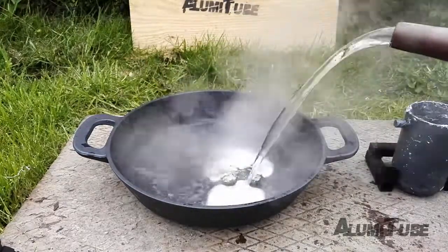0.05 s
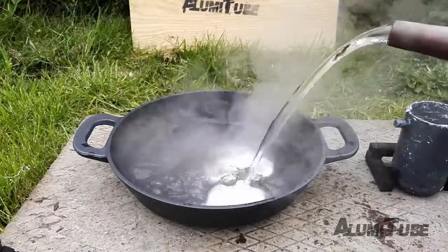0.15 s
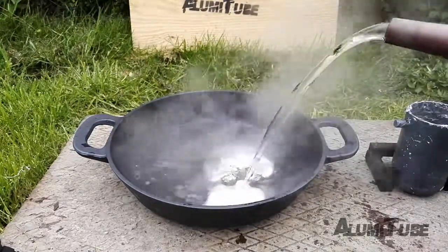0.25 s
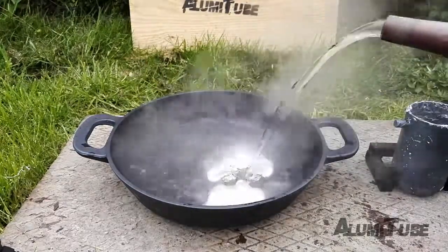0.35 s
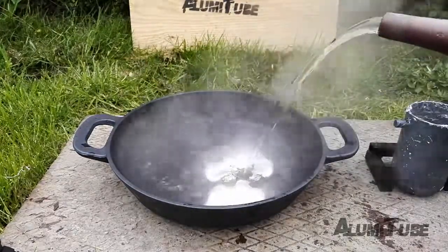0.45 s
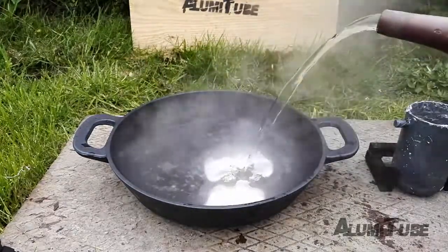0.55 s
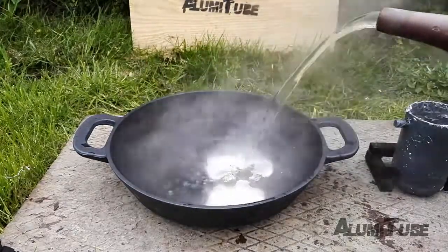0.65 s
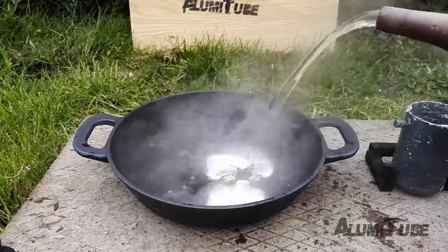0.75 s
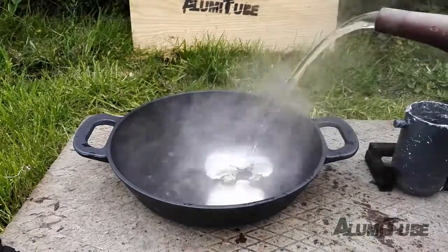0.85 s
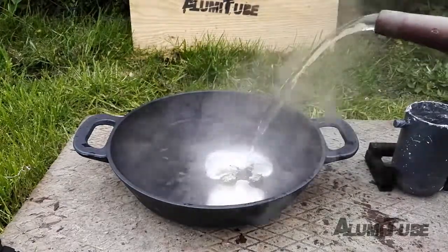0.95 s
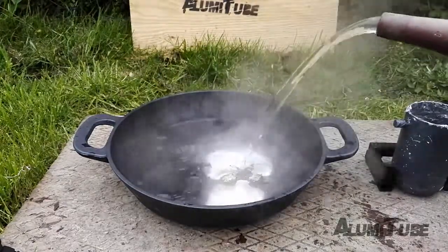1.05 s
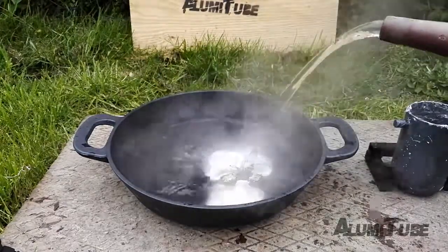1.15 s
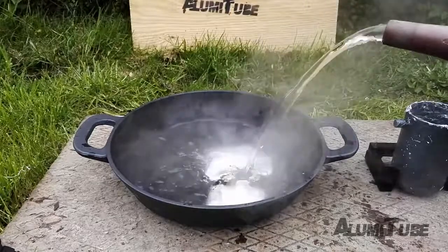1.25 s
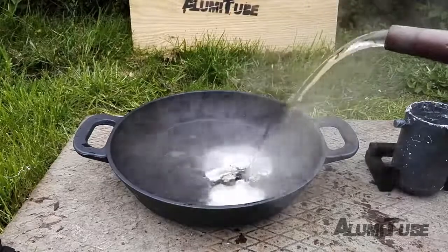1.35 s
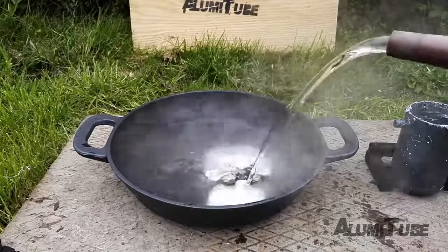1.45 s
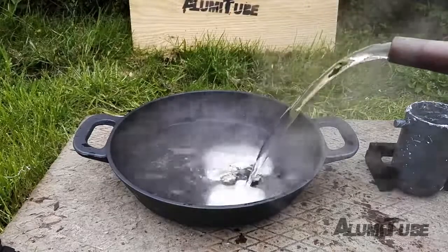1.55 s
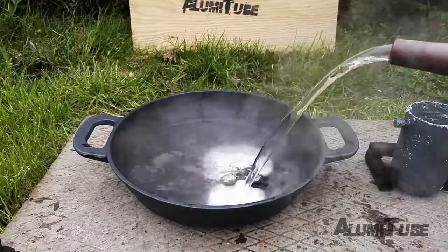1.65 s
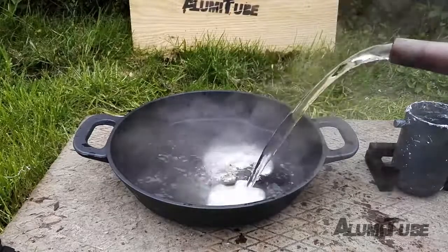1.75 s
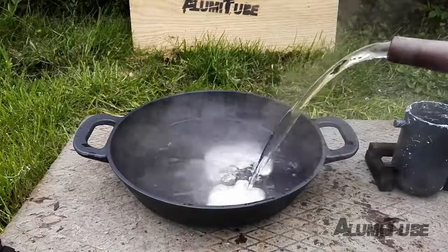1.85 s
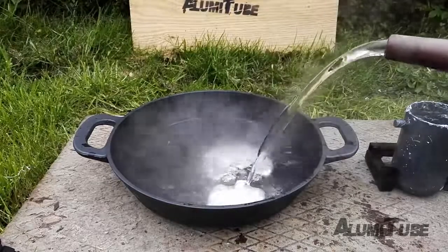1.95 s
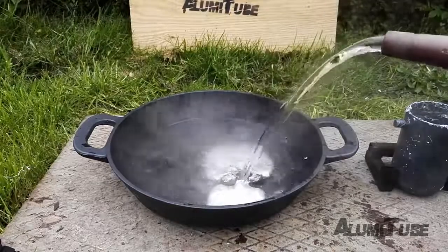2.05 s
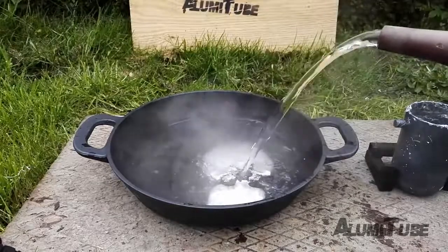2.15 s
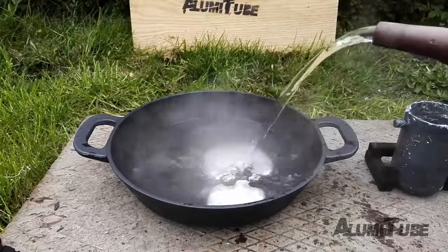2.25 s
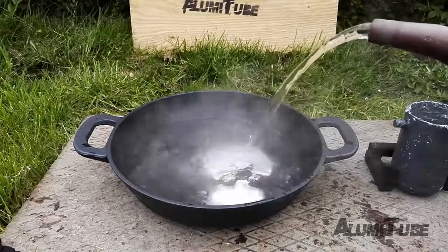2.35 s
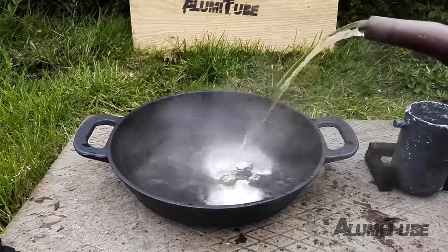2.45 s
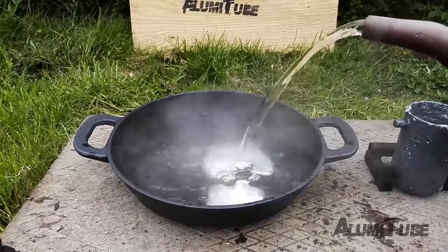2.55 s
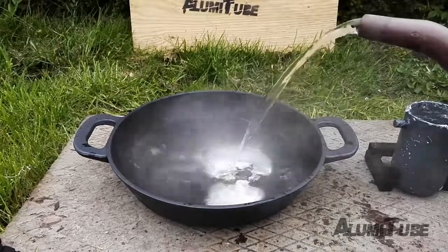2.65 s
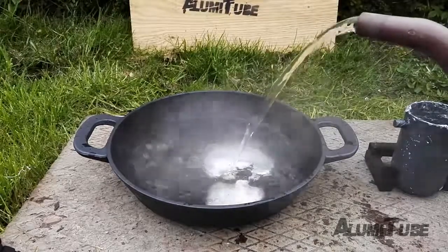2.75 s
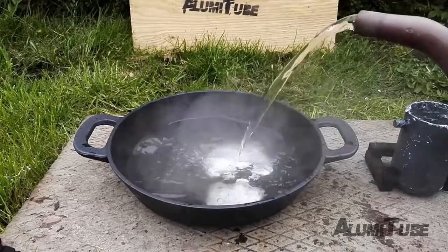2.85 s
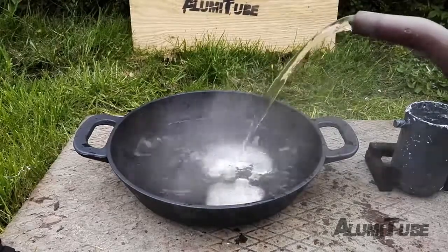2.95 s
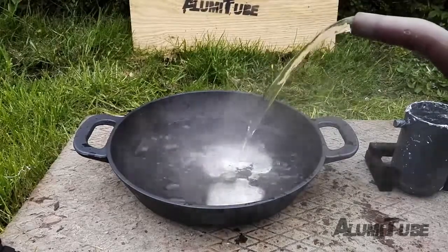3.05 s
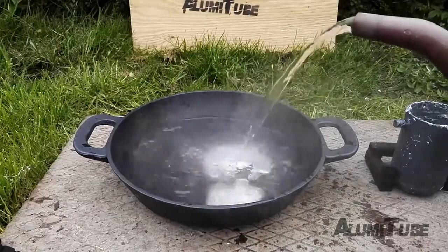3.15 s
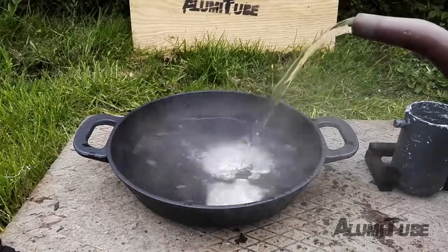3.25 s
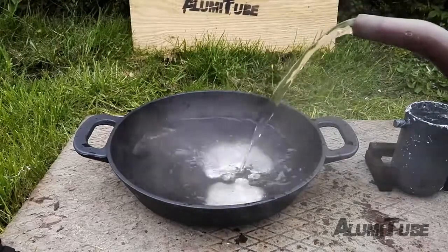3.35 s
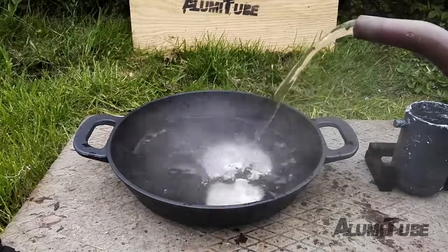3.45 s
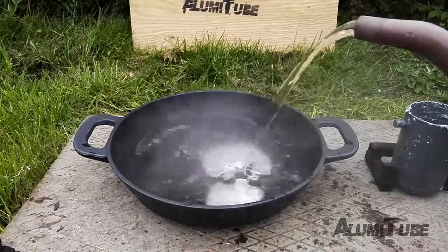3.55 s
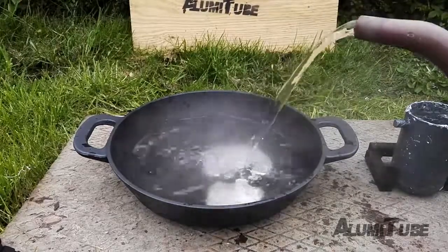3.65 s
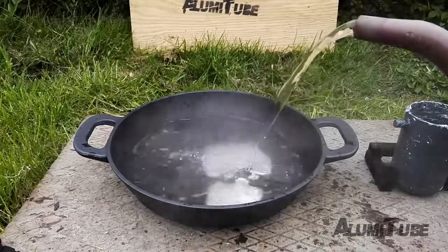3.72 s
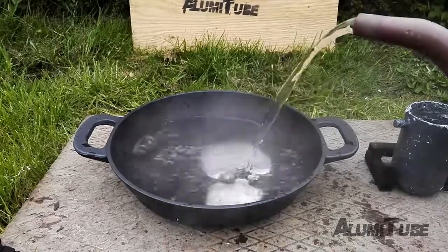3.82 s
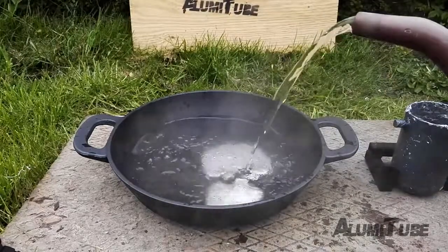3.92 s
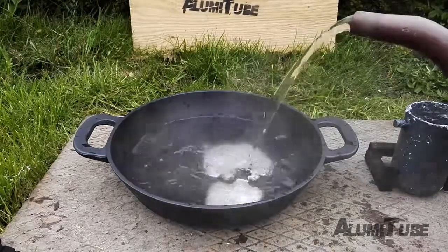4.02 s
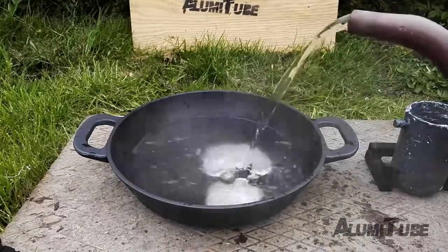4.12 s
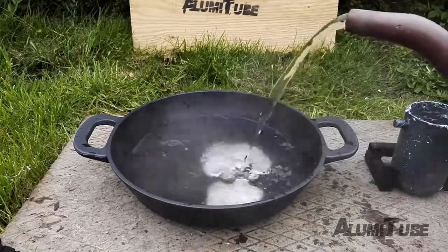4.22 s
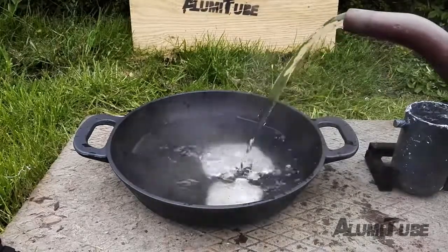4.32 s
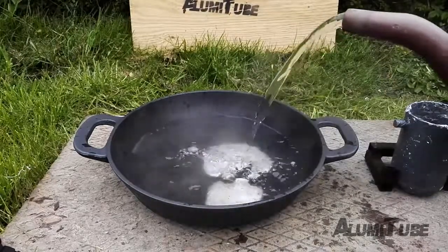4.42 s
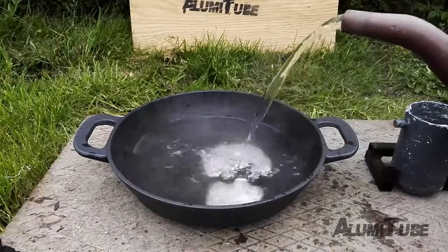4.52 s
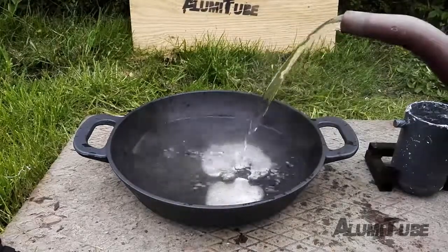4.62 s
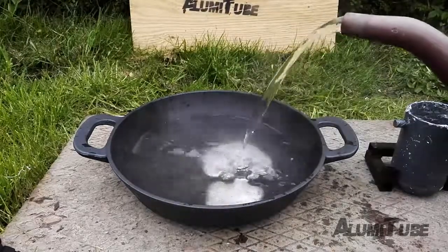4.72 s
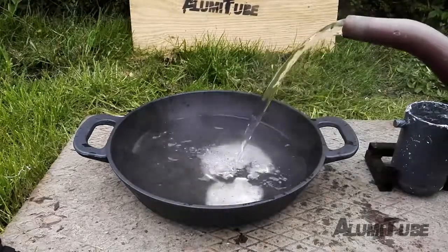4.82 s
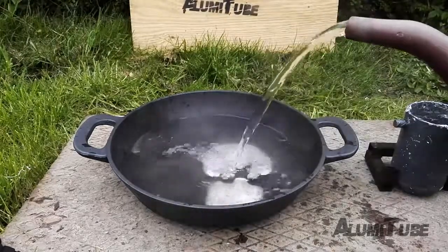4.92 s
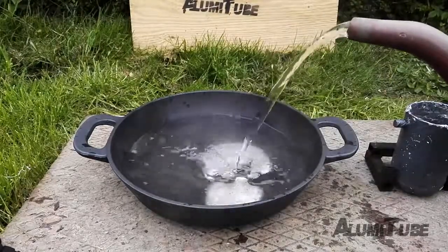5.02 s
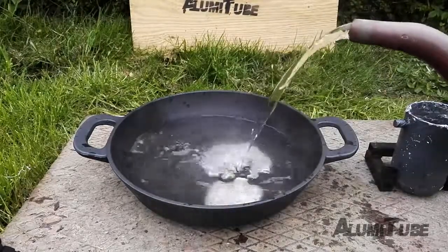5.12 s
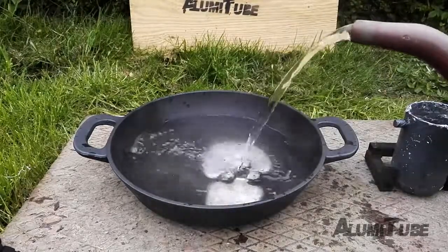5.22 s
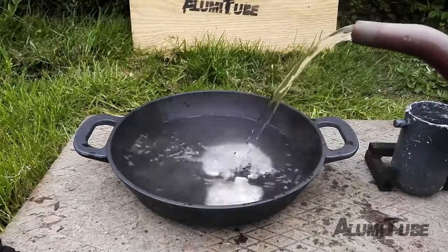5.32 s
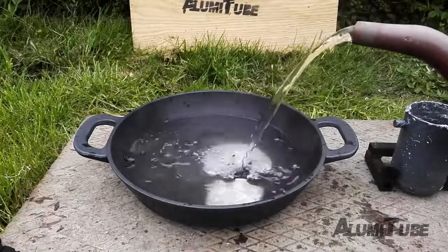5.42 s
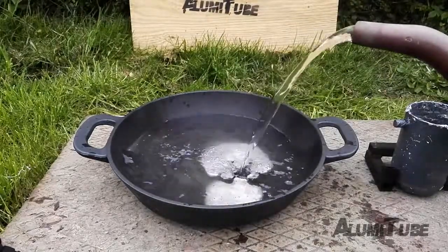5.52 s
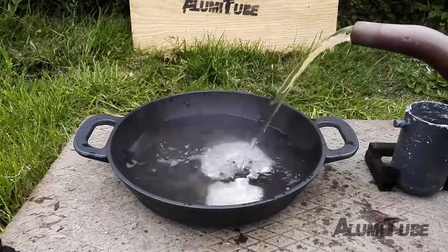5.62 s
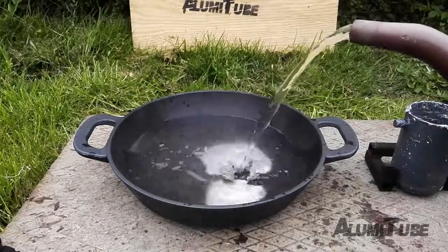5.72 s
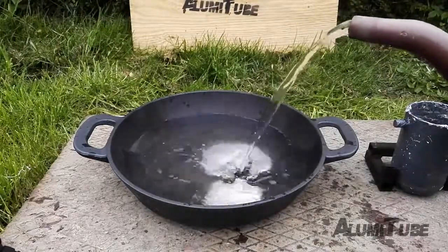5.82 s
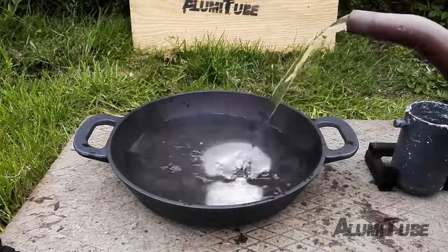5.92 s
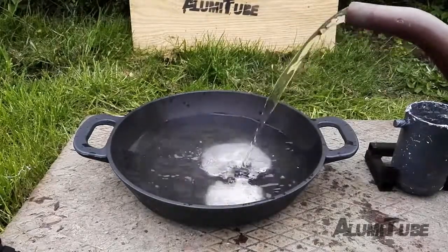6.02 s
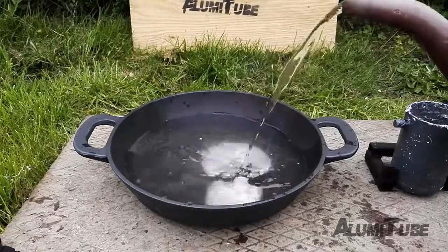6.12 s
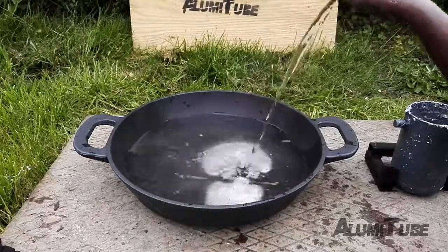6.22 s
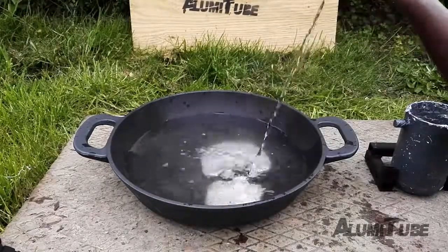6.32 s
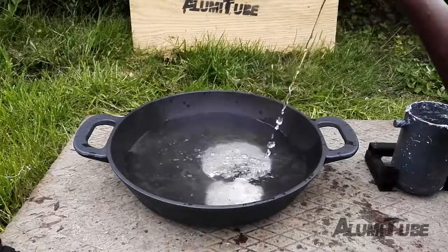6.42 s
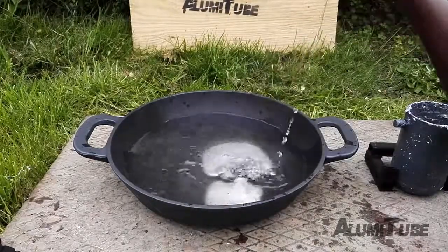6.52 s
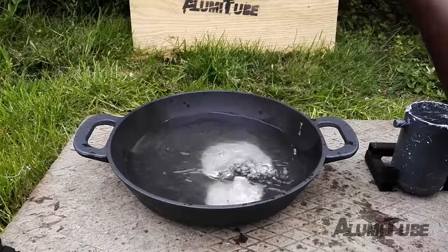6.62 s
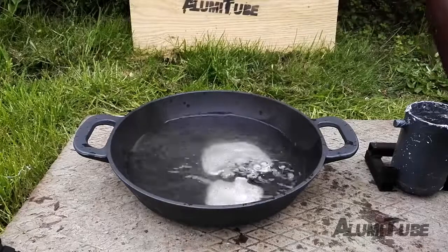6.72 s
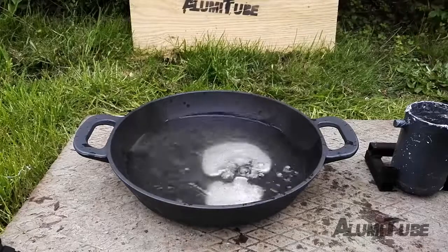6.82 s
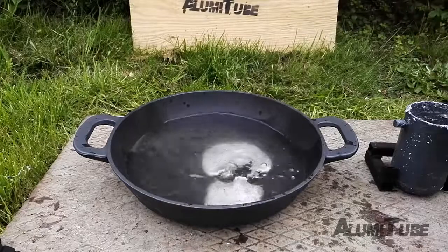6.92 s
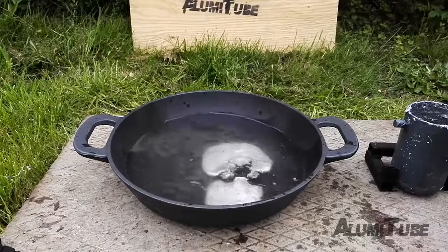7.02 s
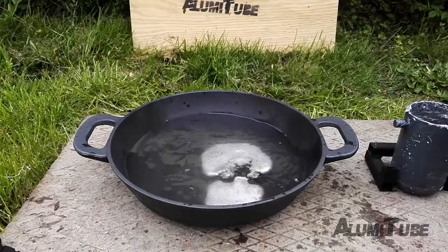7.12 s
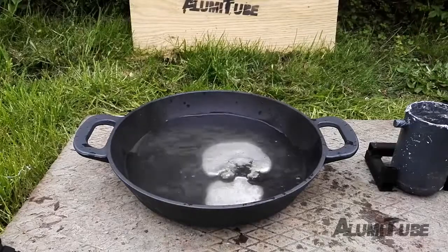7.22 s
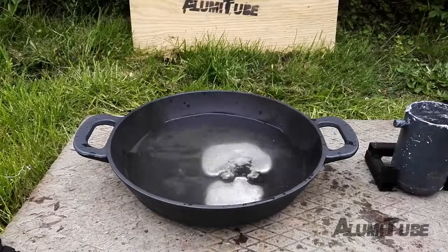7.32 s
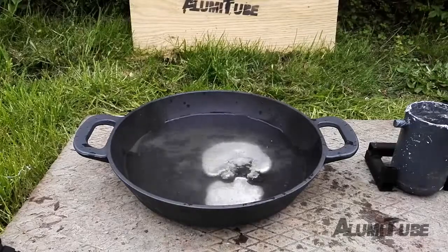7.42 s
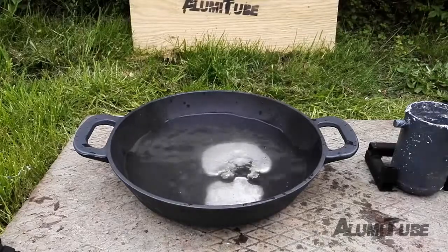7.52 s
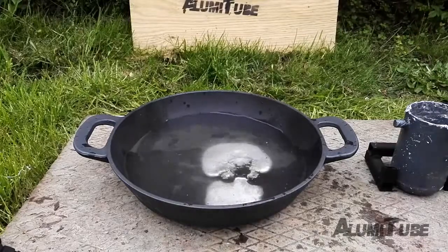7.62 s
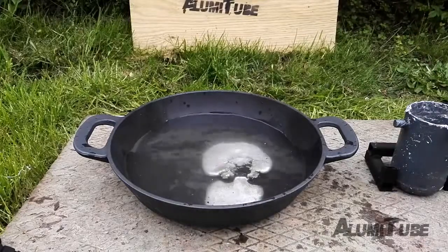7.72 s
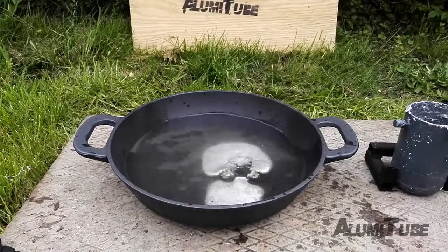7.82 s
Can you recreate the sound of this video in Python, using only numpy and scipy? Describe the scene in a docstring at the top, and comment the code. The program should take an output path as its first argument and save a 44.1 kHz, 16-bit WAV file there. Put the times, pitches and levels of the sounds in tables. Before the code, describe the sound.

A loud steam hiss and sizzle from water on hot metal fades into soft boiling, with dull knocks and crackling drops.

```python
"""Water on hot iron

Water poured on a hot casting in an iron pan, outdoors, flashes to hissing steam, then boils.
Vapour pockets collapse and knock the pan, drops spit on the hot metal, bubbles ring in the pool.
A faint low rumble swells towards the end. Two microphone ports hear the treble differently."""
import sys
import numpy as np
from scipy import signal
from scipy.fft import rfft, irfft, next_fast_len
from scipy.io import wavfile
from scipy.ndimage import uniform_filter1d, map_coordinates

SR = 44100
rng = np.random.default_rng(int(sys.argv[2]) if len(sys.argv) > 2 else 0)


def transcribe(u):
    """Save the signal u as a 16-bit wav file named by the first command-line argument.

    u: samples, shape (n,) or (channels, n), limited to [-1, 1]; the rate is SR.
    q: integer samples, one column per channel.
    """
    v = np.clip(np.atleast_2d(u).T, -1, 1)
    q = np.round(v * 32767).astype(np.int16)
    wavfile.write(sys.argv[1], SR, q)


N = 347051

# Steam jet envelope: t/s, level/dB
JET_LEVEL = [(0, -25), (.81, -25.5), (.86, -22), (1.51, -30.5), (1.66, -31.5), (1.89, -31.5), (1.96, -36),
             (1.985, -41.5), (2.2, -42.5), (3.09, -49), (3.92, -55.5), (4.3, -54.5), (4.95, -58.5),
             (5.11, -52), (5.22, -48), (5.28, -50), (5.31, -55), (5.4, -53), (5.65, -59.5), (6.14, -62),
             (6.2, -58), (6.24, -60), (6.26, -49), (6.34, -54), (6.4, -49), (6.45, -51), (6.5, -52),
             (6.54, -59), (6.57, -61), (6.79, -64), (7.87, -65)]
# Bright jet hiss: f/Hz, level/dB
JET_SPECTRUM = [(600, -120), (2400, -38), (4000, -14), (5000, -9.5), (6500, -8.5), (7800, -7), (9000, -2.5),
                (10400, 2.5), (11700, 1), (13000, 2), (14200, -3)]
# Sudden puffs of steam: t/s, hold/s, level/dB
PUFFS = [(0.579, 0.19, -27.5), (0.806, 0.22, -29.5), (1.022, 0.031, -30.5), (1.56, 0.038, -26.5),
         (3.952, 0.052, -49.5), (4.045, .015, -73), (4.093, 0.035, -55), (4.259, 0.043, -41.5),
         (4.364, 0.16, -53.5), (4.457, 0.026, -56), (4.6, .03, -58), (4.832, 0.037, -52),
         (5.487, 0.036, -52), (5.874, 0.13, -56.5), (6.4, 0.022, -47), (6.504, 0.029, -51),
         (6.585, 0.041, -55.5), (6.938, .04, -65), (7.554, 0.063, -57.5)]
# Brief dip in the hiss: start/s, end/s, gain/dB
HISS_DIP = (1.013, 1.03, -7.5)
# Share of crackle and fizz, small once the pouring stops: t/s, gain/dB
SPATTER_MIX = [(0, -41), (1.9, -13), (3.9, -9), (4.2, -6), (6.6, -6), (6.75, -28)]
# Sizzle envelope: t/s, level/dB
SIZZLE_LEVEL = [(0, -44.5), (.43, -41), (.46, -42), (.49, -40.5), (.62, -42), (.73, -45), (.82, -40.5),
                (.99, -40.5), (1.02, -47), (1.05, -42), (1.11, -44.5), (1.31, -42.5), (1.4, -49),
                (1.59, -42), (1.65, -49.5), (1.92, -45.5), (1.97, -48.5), (2.35, -53.5), (2.96, -53.5),
                (4.1, -59.5), (4.4, -57.5), (5.33, -59.5), (5.74, -63.5), (6.49, -59), (6.82, -68),
                (7.87, -66)]
# Midrange sizzle: f/Hz, level/dB
SIZZLE_SPECTRUM = [(150, -120), (500, -27), (900, -11), (1500, -3.5), (2000, -2.5), (2350, -2.5), (2900, 1),
                   (3350, -2.5), (3700, -2.5), (4100, -4), (5500, -5.5), (8000, -9.5), (12000, -38)]
# Bursting drops: t/s, peak/dB, f/Hz, left-right/dB, half-life/ms
DROPS = [(.596, -2.5, 9800, -2, 0.64), (2.1936, -36.5, 12900, 0, .6), (3.491, -24.5, 11900, -4, 0.93),
         (4.0484, -33, 12200, -5, 0.68), (4.056, -26, 11300, 4, 0.93), (4.0964, -37.5, 13500, 2, .6),
         (4.1923, -31, 12200, 0, 0.52), (4.264, -29, 12800, 1, .9), (4.272, -33, 9500, 0, .7),
         (4.358, -29.5, 11500, 10, 1.1), (4.369, -31, 12500, 0, .6), (4.416, -35, 12000, 4, .4),
         (4.422, -36, 10500, 2, .6), (4.445, -41, 4800, 0, .7), (4.47, -23.5, 10500, 1, .7),
         (4.508, -41, 6000, 0, .7), (4.528, -37, 9000, 0, .6), (4.5935, -30.5, 10500, -3.5, .35),
         (4.6112, -25.5, 9600, -0.5, .6), (4.6725, -36, 8800, .5, .8), (4.791, -32, 4900, 2, 1),
         (4.79, -35, 11000, 0, .7), (4.799, -32, 13500, -1, .7), (4.848, -35, 12400, 7, 1.5),
         (4.856, -39, 11000, 0, 1.5), (4.862, -39, 12000, 0, 1.5), (4.995, -33, 12200, -4, .45),
         (5.005, -38, 10500, 0, .4), (5.018, -41, 9500, 0, .4), (5.035, -31, 10500, 4, .35),
         (5.129, -36, 11500, 2, .7), (5.188, -36, 4200, -2, .6), (5.212, -38, 9500, 8, .4),
         (5.307, -24, 10700, 1, 0.36), (5.346, -33, 14000, 1, 1.1), (5.378, -36, 9000, 0, .4),
         (5.583, -28, 10100, -1, 0.61), (5.739, -38, 4660, -1.5, .6), (5.8747, -34, 8000, 0, .4),
         (6.1664, -33.5, 10700, -2.5, 0.54), (6.1754, -40, 10700, 1, .7), (6.1948, -28.5, 12400, 1, .6),
         (6.1964, -35.5, 6000, 0, 0.67), (6.216, -33, 10700, .5, 0.76), (6.243, -23, 8800, 4, 0.49),
         (6.2428, -27, 12500, -4, .6), (6.2595, -36, 7800, 3, .6), (6.2685, -34, 9930, 1, 0.65),
         (6.2796, -32, 13800, -4, .6), (6.282, -34, 9300, 0, .7), (6.293, -29, 10300, 3, 0.32),
         (6.3245, -36, 12000, -3, 1.3), (6.349, -33, 6750, 0, 1.4), (6.3555, -27, 9800, 6, .7),
         (6.359, -31, 11000, 2, 1.1), (6.3785, -32, 9000, -7, .9), (6.39, -32, 12000, 0, 1.2),
         (6.391, -33, 4800, -1, 1.2), (6.392, -26, 8500, 1, 0.85), (6.4145, -37.5, 10000, -4, .8),
         (6.448, -19.5, 10150, -2, .6), (6.4572, -23, 12800, -4, .9), (6.465, -22, 10300, 2, 1),
         (6.4762, -32, 11500, 0, .8), (6.479, -35, 6500, 0, .4), (6.4875, -25.5, 10900, -4.5, 1.2),
         (6.502, -35, 5000, 0, 1.1), (6.503, -25, 10500, 1, 1.4), (6.505, -29, 8450, -1, 1.1),
         (6.571, -42, 10900, 0, .6), (6.587, -39, 10600, 4, .45), (6.588, -23, 4420, 2, 0.74),
         (6.672, -33.5, 5740, 1, 0.99), (6.948, -40.5, 11900, 10, .6), (7.032, -38, 12500, 2, .45)]
# Modes of the water-filled iron pan: f/Hz, width/Hz, level/dB
PAN_MODES = [(346.4, 12.7, -0.5), (370.7, 10, -1), (561, 80, -5), (769, 29, -6), (844, 14, -3.5),
             (1075, 43, -7), (1400, 125, -15), (1840, 870, -10.5)]
# Collapsing vapour pockets: t/s, level/dB
COLLAPSES = [(0.411, -44), (2.034, -31), (2.309, -47), (2.37, -36.5), (2.49, -33.5), (2.698, -44),
             (2.748, -39.5), (2.8, -40), (2.957, -36.5), (3.014, -36), (3.082, -40.5), (3.259, -40),
             (3.43, -42), (3.581, -44), (3.639, -42), (3.705, -35.5), (3.824, -38.5), (3.903, -35),
             (4.601, -40), (4.826, -30), (4.912, -30), (4.954, -37.5), (4.996, -35.5), (5.036, -36),
             (5.074, -41.5), (5.177, -39.5), (5.237, -43), (5.281, -46), (5.34, -41), (5.416, -41),
             (5.47, -44), (5.547, -42.5), (5.646, -42.5), (5.738, -45), (5.797, -49)]
# Sharp implosion within each blow: t/s, gain/dB
IMPLOSION_MIX = [(2, -1), (2.6, -8), (3, -6), (4.6, -9), (4.9, -2), (5.1, -5), (5.8, -7)]
# Water slapping shut over a pocket: t/s, gain/dB
SLAP_MIX = [(2, -13), (4.6, -9), (4.85, -6.5), (5.1, -6), (5.8, -3.5)]
# A pocket's own note, clearest in mid-depth water: t/s, gain/dB
NOTE_MIX = [(2, -18), (4, -20), (4.8, -8), (4.95, -5.5), (5.0, -13), (5.15, -5), (5.8, -11)]
# Low thump of a collapse: t/s, gain/dB
THUMP_MIX = [(1.9, 4), (2, 4.5), (3, 2), (5.8, -4)]
# Pool envelopes: t/s, deep boil/dB, froth/dB
POOL_LEVELS = [(0, -56, -53), (.06, -63, -56.5), (.12, -58.5, -55.5), (.65, -52, -60), (.76, -55.5, -61),
               (.8, -59, -60), (.89, -72, -54), (.94, -61.5, -52.5), (1.27, -53, -53), (1.97, -54.5, -50.5),
               (2.76, -53.5, -56), (3.35, -54.5, -57), (3.99, -60.5, -61), (4.4, -65.5, -62.5),
               (4.6, -80, -62.5), (4.86, -58, -77), (5.02, -62.5, -62.5), (5.76, -62, -77),
               (5.96, -61, -69.5), (6.55, -59.5, -68), (6.79, -60, -72.5), (7.87, -64.5, -70)]
# Share of bubbles in the froth, small once the pouring stops: t/s, gain/dB
BUBBLE_MIX = [(0, -2), (3.9, -22), (4.3, -13.5), (6.7, 5), (6.9, -21)]
# Larger bubbles: t/s, level/dB, f/Hz
BIG_BUBBLES = [(2.04, -34, 593), (2.046, -39, 1140), (2.072, -38, 787), (2.83, -45, 900), (2.87, -45, 1720),
               (3.082, -40, 584), (3.29, -47, 1020), (3.668, -42, 573), (3.72, -43, 563),
               (3.907, -40.5, 566), (5.281, -51, 610), (5.282, -50, 830), (5.476, -55, 560),
               (2.759, -49, 570), (2.75, -42, 1730), (2.79, -40, 1530), (2.849, -38, 1320),
               (2.856, -46, 1050), (4.439, -45, 1230), (4.471, -44, 2460), (4.525, -46, 2710),
               (4.605, -43.5, 2880), (4.776, -45, 2500), (5.072, -46, 1460), (5.224, -45.5, 2500),
               (5.995, -56, 1910), (6.03, -50, 880), (6.045, -47, 1780), (6.058, -48, 2480),
               (6.095, -58, 1520), (6.485, -48, 1450), (6.533, -40.5, 685), (6.546, -39.5, 508),
               (6.601, -46, 415), (6.625, -43.5, 460), (6.661, -49, 1640), (6.685, -50, 640),
               (6.707, -50, 750)]
# Water slopping: t/s, hold/s, level/dB, f/Hz
GUSHES = [(0.764, 0.018, -41, 2970), (0.78, 0.026, -44, 1800), (2.051, 0.1, -55.5, 1420),
          (4.266, 0.037, -59.5, 2680), (4.46, 0.035, -56, 2500), (5.107, .006, -54, 2300),
          (5.358, 0.0092, -56, 2400), (5.643, 0.0066, -57, 1970), (6.265, 0.002, -48.5, 1960),
          (6.503, 0.028, -50.5, 3900), (6.586, 0.041, -55.5, 4300)]
# Bass level as heard, dropping out briefly early on: t/s, level/dB
BASS_LEVEL = [(0, -78), (.06, -100), (.12, -70), (.4, -64), (.5, -97), (.6, -63), (.72, -82), (.78, -105),
              (.9, -105), (1.05, -74), (1.9, -73), (2.2, -68), (3.2, -64), (4.1, -70), (5.2, -65.5),
              (5.45, -63.5), (5.6, -60), (6.4, -56), (7.2, -57), (7.87, -59.5)]
# Dark rumble: f/Hz, level/dB
RUMBLE_SPECTRUM = [(15, -46), (25, -28), (49, 0.5), (178, 1.5), (222, -1), (300, -11.5), (390, -43),
                   (660, -120)]
# Hum within the rumble: t/s, level/dB
HUM_LEVEL = [(5.6, -95), (6.3, -85), (6.7, -72), (7.1, -63), (7.5, -96)]
# Faint narrow hiss: t/s, level/dB
WHINE_LEVEL = [(6.6, -100), (7.0, -72), (7.3, -68.5), (7.87, -69)]
# Stereo image of steam and froth: f/Hz, left-right likeness
STEAM_IMAGE = [(60, 0), (120, 0.3), (240, 0.65), (470, 0.82), (930, 0.9), (1840, 0.83), (3650, 0.93),
               (7240, 0.2), (14400, 0.0)]
# Stereo image of deep boil and background: f/Hz, left-right likeness
POOL_IMAGE = [(60, 1), (120, 0.95), (240, 0.89), (470, 0.91), (930, 0.099), (1840, 0.08), (3650, 0.18),
              (7240, 0.15), (14400, 0.16)]
# Colour difference between the ports: f/Hz, left-right/dB
PORT_BALANCE = [(60, -1.4), (500, 0), (1500, 0.7), (5000, 0), (7000, -0.5), (8500, -2.5), (10300, -4),
                (11500, -0.5), (12500, 5), (13500, 4)]


def amp(db):
    return 10 ** (np.asarray(db) / 20)


def unit(x):
    return x / np.sqrt(np.mean(x ** 2) + 1e-20)


def along(points, hz):
    """Read (Hz, value) points on a log axis."""
    f, v = np.transpose(points)
    return np.interp(np.log(hz + 1), np.log(f + 1), v)


def curves(rows):
    """One value per sample for each column after the time."""
    s, *cols = np.transpose(rows)
    return [np.interp(np.arange(N) / SR, s, c) for c in cols]


def wobble(rate):
    """A smooth random curve, rate knots a second."""
    return map_coordinates(rng.standard_normal(int(N * rate / SR) + 4), [np.arange(N) * rate / SR])


def filtered(x, response):
    """Filter x by a complex response of frequency."""
    m = next_fast_len(N + SR // 2)
    return irfft(rfft(x, m) * response(np.fft.rfftfreq(m, 1 / SR)), m)[..., :N]


def low_cut(hz, corner):
    return (1j * hz / (corner + 1j * hz)) ** 2


def strike(t, attack_s, t60_s):
    return (1 - np.exp(-t / attack_s)) * amp(-60 * t / t60_s)


def add(track, s, sound):
    track[..., round(s * SR):][..., :sound.shape[-1]] += sound


def rush(response, image, patchy_db):
    """Stereo noise of rms 1 with patches of random gain."""
    z = signal.stft(rng.standard_normal((2, N)), nperseg=256)[2]
    patches = uniform_filter1d(rng.standard_normal(z.shape[1:]), size=4, axis=0)
    patches = unit(uniform_filter1d(patches, size=10, axis=1))
    pair = signal.istft(z * amp(patchy_db * patches), nperseg=256)[1][:, :N]
    turn = lambda hz: np.arccos(np.clip(along(image, hz), -1, 1)) / 2
    mid, side = filtered(pair, lambda hz: response(hz) * [np.cos(turn(hz)), np.sin(turn(hz))])
    return unit(np.array([mid + side, mid - side]))


def grains(count, hz, spread, cycles, scatter_db, size):
    """A shower of damped, rising sines, rms 1; each has its own stereo place."""
    at, pitch, level, place, lag = rng.random((count, 5)).T[..., None]
    turns = np.clip(hz * np.exp(spread * (2 * pitch - 1)), 50, 14000) * np.arange(size) / SR
    pings = np.sin(2 * np.pi * turns * (1 + 0.0866 * turns / cycles)) * np.exp(-turns / cycles)
    pings *= amp(-scatter_db * np.log(np.maximum(level, 0.01)))
    index = (at * N).astype(int) + np.arange(size)
    left = np.bincount((index + (8 * lag).astype(int)).ravel(), (pings * np.cos(place + 0.64)).ravel(), N)
    right = np.bincount((index + 4).ravel(), (pings * np.sin(place + 0.42)).ravel(), N)
    return unit(filtered(np.array([left[:N], right[:N]]), lambda f: 1 / (1 + (0.12 * hz / (f + 1)) ** 6)))


def steam_flow():
    """The steam's envelope: a flow with sudden puffs and one brief dip."""
    t = np.arange(N) / SR
    puffs = sum(amp(db - 450 * np.maximum(t - s - hold, 0)) * np.clip((t - s) / 0.003, 0, 1)
                for s, hold, db in PUFFS)
    start, end, dip_db = HISS_DIP
    dip = amp(dip_db * np.clip(np.minimum(t - start, end - t) / 0.0043, 0, 1))
    return np.hypot(amp(curves(JET_LEVEL)[0]), puffs) * dip


def steam():
    """Turbulent jets flutter and sputter; tiny drops crackle and fizz on the hot metal."""
    flutter, spatter = wobble(30), amp(curves(SPATTER_MIX)[0])
    jet = rush(lambda hz: amp(along(JET_SPECTRUM, hz)), STEAM_IMAGE, patchy_db=1.5)
    crackle = grains(count=12000, hz=10200, spread=0.5, cycles=5, scatter_db=1.5, size=128)
    sizzle = rush(lambda hz: amp(along(SIZZLE_SPECTRUM, hz)), STEAM_IMAGE, patchy_db=2)
    fizz = grains(count=11000, hz=2555, spread=0.8, cycles=4.5, scatter_db=4, size=300)
    flow = steam_flow() * amp(0.22 * flutter + 0.5 * wobble(90))
    jet *= amp(3.1 * spatter * wobble(25))
    crackle *= spatter * amp(2.5 * wobble(40))
    frying = amp(curves(SIZZLE_LEVEL)[0] + 1.03 * flutter)
    return flow * (jet + crackle) + frying * (sizzle + amp(1.5) * spatter * fizz)


def spits():
    """Each bursting drop is a few ms of pitched noise with a weak wet tail."""
    lead_s, out = 0.008, np.zeros((2, N))
    t, f = np.arange(2048) / SR - lead_s, np.fft.rfftfreq(2048, 1 / SR)
    for s, db, hz, balance_db, half_life_ms in DROPS:
        half_lives = 1000 * t / half_life_ms
        swell = 2.0 ** np.where(t < 0, half_lives / 0.4, -half_lives)
        tail = 0.085 * (t > 0) * amp(-60 * t / 0.045)
        colour = (1 / (1 + ((f - hz) / (0.087 * hz)) ** 2) + 0.12) / (1 + (0.37 * hz / (f + 1)) ** 8)
        noise = rng.standard_normal((3, len(t)))
        burst = noise[:2] + 0.64 * noise[2]
        burst[:, round(lead_s * SR)] += 3  # the drop's skin tears with one sharp tick
        drop = irfft(rfft(burst) * colour) * (swell + tail)
        drop /= np.abs(drop).max(axis=1, keepdims=True)
        add(out, s - lead_s, amp(db + balance_db * np.array([[0.5], [-0.5]])) * drop)
    return out


def pan_wall(hz):
    """The iron pan's resonances, with dark gaps between them."""
    return sum(amp(db) * 1j * hz * width / (mode ** 2 - hz ** 2 + 1j * hz * width)
               for mode, width, db in PAN_MODES)


def knocks():
    """Vapour pockets collapse: a blow on the pan together with a slap, a note and a thump in the water."""
    blows, water = np.zeros(N), np.zeros((2, N))
    t, f = np.arange(3072) / SR, np.fft.rfftfreq(3072, 1 / SR)
    implosion = np.exp(-(2 * np.pi * 800 * (t - 0.0025)) ** 2)
    cycles = 455 * t + 2.618 * (1 - np.exp(-t / 0.01))  # the note falls as the pocket swells again
    note = np.sin(2 * np.pi * cycles) * strike(t, 0.017, 0.14)
    for s, db in COLLAPSES:
        mix = lambda table: amp(np.interp(s, *np.transpose(table)))
        collapse = rng.standard_normal(len(t)) * (strike(t, 0.0037, 0.07) + 0.4 * strike(t, 0.0037, 0.25))
        blow = 0.83 * collapse / np.abs(collapse).max() - mix(IMPLOSION_MIX) * implosion
        add(blows, s, amp(db + 5.5) * blow)
        slosh = rng.standard_normal((2, len(t))) + 1.13 * collapse / collapse.max()
        slap = unit(irfft(rfft(slosh) / (1 + ((f - 993) / 500) ** 4))) * strike(t, 0.0061, 0.07)
        thump = np.sin(2 * np.pi * rng.uniform(172, 225) * t) * strike(t, 0.001, 0.021)
        add(water, s, amp(db) * (mix(SLAP_MIX) * slap + mix(NOTE_MIX) * note + mix(THUMP_MIX) * thump))
    body = lambda hz: (amp(11.5) * pan_wall(hz) + 0.15 * low_cut(hz, 250)) / (1 + 1j * hz / 1900) ** 3
    return filtered(blows, body) + filtered(water, lambda hz: low_cut(hz, 90))


def boiling():
    """Seething water and froth drive the pan's modes while small bubbles ring."""
    boil_db, froth_db = curves(POOL_LEVELS)
    churn = wobble(40)
    deep = lambda hz: (pan_wall(hz) + 0.59 / (1 + (hz / 700) ** 2)) / (1 + (200 / (hz + 1)) ** 8)
    light = lambda hz: ((np.abs(pan_wall(hz)) + 0.19) / (1 + (hz / 1500) ** 4)
                        / (1 + (600 / (hz + 1)) ** 4) / (1 + (330 / (hz + 1)) ** 6))
    seethe = unit(amp(1.8 * churn) * rush(deep, POOL_IMAGE, patchy_db=2))
    froth = amp(churn) * rush(light, STEAM_IMAGE, patchy_db=3)
    bubbles = grains(count=3000, hz=1132, spread=0.587, cycles=5.3, scatter_db=0.5, size=1200)
    return amp(boil_db) * seethe + amp(froth_db) * (froth + amp(curves(BUBBLE_MIX)[0]) * bubbles)


def plops():
    """Larger bubbles ring raggedly among the splashes, rising in pitch."""
    out, t = np.zeros((2, N)), np.arange(3072) / SR
    for s, db, hz in BIG_BUBBLES:
        ragged = 1 + 0.63 * uniform_filter1d(rng.standard_normal((2, len(t))), size=40) * np.sqrt(40)
        envelope = amp(db - 60 * t / 0.047) * (1 - np.exp(-t / 0.00095)) ** 2
        add(out, s, envelope * ragged * np.sin(2 * np.pi * hz * t * (1 + 3 * t)))
    return filtered(out, lambda hz: low_cut(hz, 90))


def splashes():
    """Water slops in short, sputtering gushes of pitched noise."""
    out, fade_db_per_s = np.zeros((2, N)), 900
    t, f = np.arange(8192) / SR, np.fft.rfftfreq(8192, 1 / SR)
    for s, hold, db, hz in GUSHES:
        noise = rng.standard_normal((3, len(t)))
        gush = unit(irfft(rfft(1.15 * noise[:2] + noise[2]) / (1 + ((f - hz) / (0.27 * hz)) ** 4)))
        sputter_db = 3 * unit(uniform_filter1d(rng.standard_normal(len(t)), size=130))
        envelope = amp(db - fade_db_per_s * np.maximum(t - hold, 0)) * (1 - np.exp(-t / 0.0031))
        add(out, s, envelope * amp(sputter_db) * gush)
    return out


def bass_gain():
    """The bass level; it comes and goes under the loud opening hiss."""
    unsteady_db = 6 * np.tanh(2 * wobble(10.9)) * (np.arange(N) < 2.3 * SR)
    return amp(curves(BASS_LEVEL)[0] + unsteady_db)


def low_rumble():
    """A faint, lumpy rumble swells towards the end, joined by a wavering hum and a narrow hiss."""
    gain, lumps = bass_gain(), amp(1.15 * wobble(30))
    rumble = unit(lumps * rush(lambda hz: amp(along(RUMBLE_SPECTRUM, hz)), POOL_IMAGE, patchy_db=-0.5))
    hum = np.sqrt(2) * np.sin(2 * np.pi * np.cumsum(55 + 1.6 * wobble(9.5)) / SR)
    whine = rush(lambda hz: 1 / (1 + ((hz - 1340) / 50) ** 2), POOL_IMAGE, patchy_db=3)
    return gain * rumble + amp(curves(HUM_LEVEL)[0]) * hum + amp(curves(WHINE_LEVEL)[0]) * whine


def scene():
    return steam() + spits() + splashes() + boiling() + knocks() + plops() + low_rumble()


def record(dry):
    """The two ports differ in colour; the sound has no treble above 14.3 kHz."""
    sides, top_hz = np.array([[0.5], [-0.5]]), 14300
    return filtered(dry, lambda hz: amp(along(PORT_BALANCE, hz) * sides) * (hz < top_hz))


dry = scene()
out = record(dry)
transcribe(out)
```